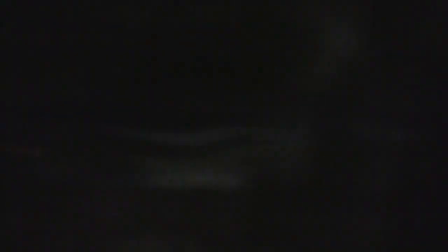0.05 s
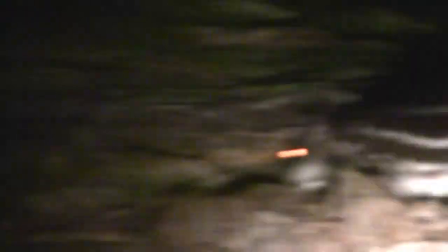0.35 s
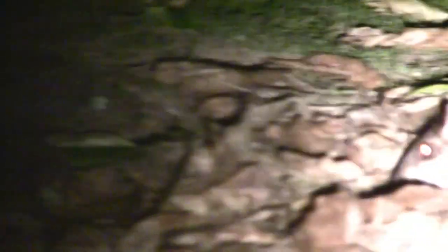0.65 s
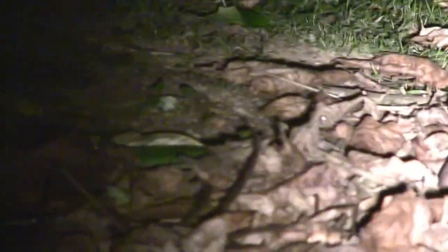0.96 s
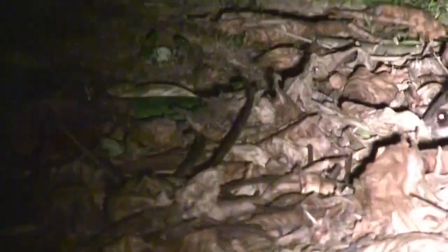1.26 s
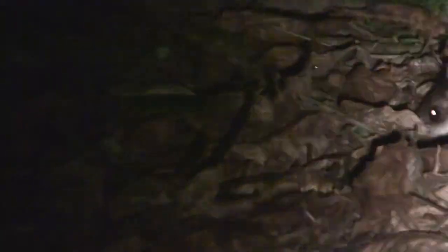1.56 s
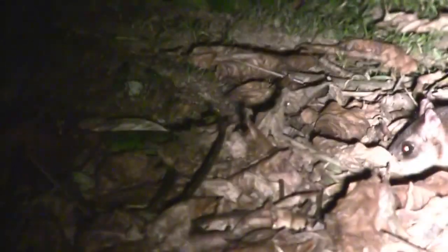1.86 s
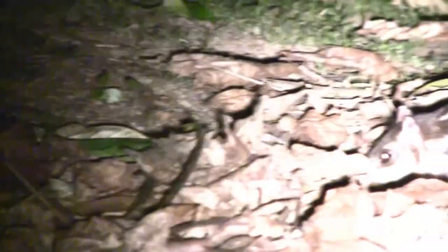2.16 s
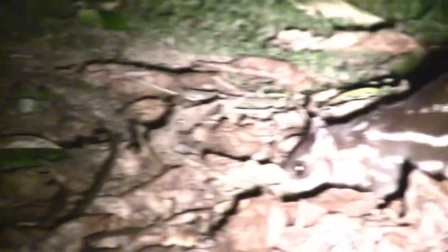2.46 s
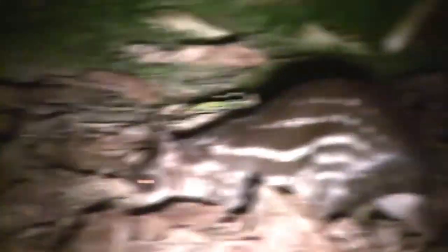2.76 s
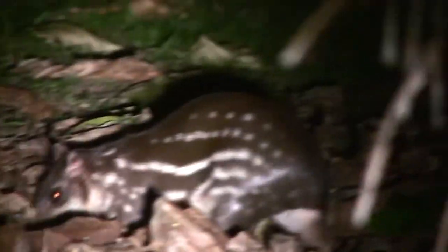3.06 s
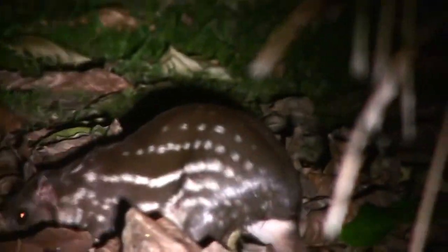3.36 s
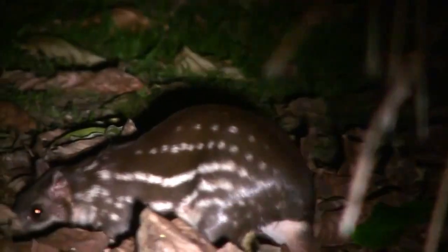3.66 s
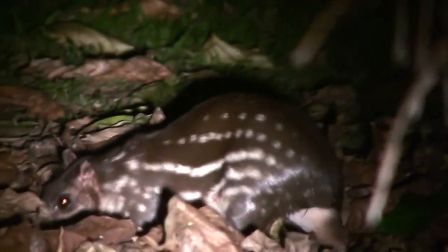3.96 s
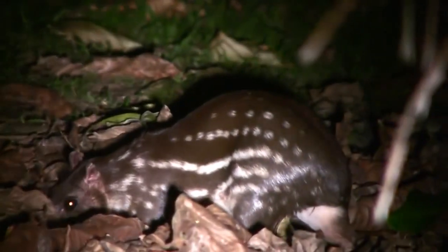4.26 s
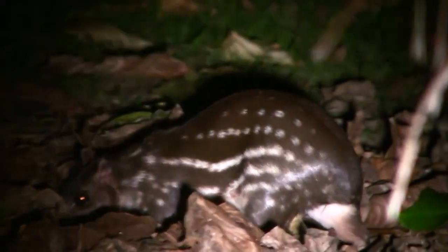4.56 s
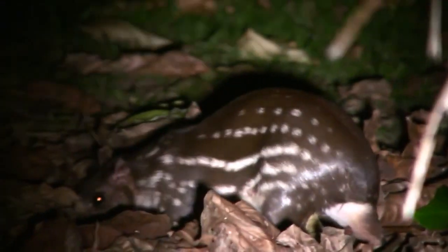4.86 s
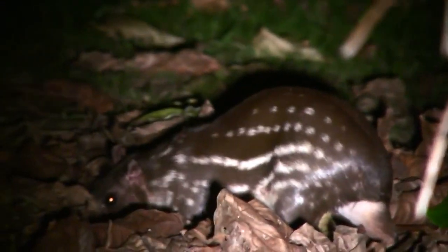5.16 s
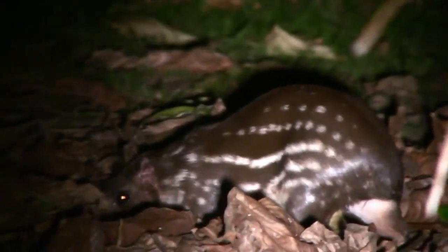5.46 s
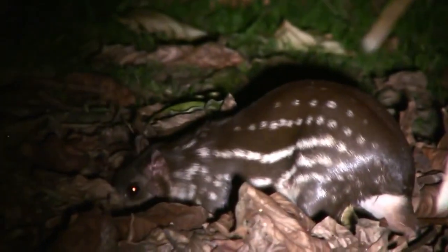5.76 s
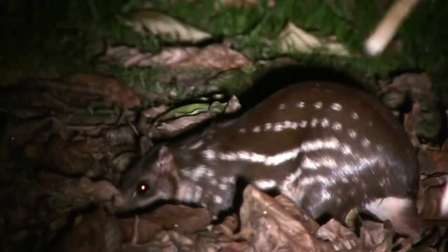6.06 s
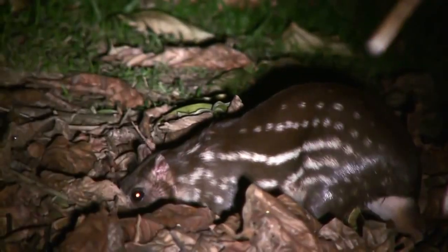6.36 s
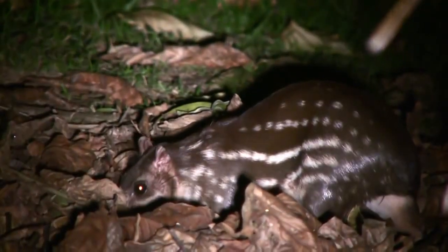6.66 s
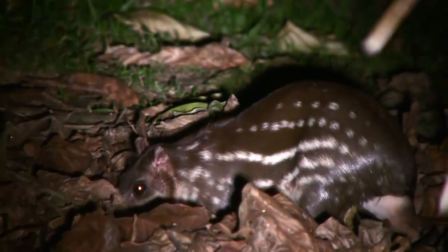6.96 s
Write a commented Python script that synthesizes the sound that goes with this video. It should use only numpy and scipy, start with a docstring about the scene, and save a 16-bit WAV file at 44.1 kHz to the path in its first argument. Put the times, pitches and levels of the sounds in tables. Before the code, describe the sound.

A shrill but soft wash of night insects runs throughout, picked up by a hand-held camera in a forest, with regular cricket chirps, swelling trills and a very faint motor hum. About four seconds in comes a close, deep handling thump, the loudest sound. Several more dull knocks follow between five and six seconds. The chorus carries on, and a katydid starts ticking quickly in the last second.

```python
"""A forest at night, heard from a hand-held camera whose motor hums faintly.
Insects sing by tooth strikes that drive a wing resonance. Far ones merge into shrill bands;
nearer ones chirp, buzz and swell. A high katydid hiss stops and a ticking song starts.
Fingers knock dully on the camera, ringing its body modes. Dry leaves stir over a soft air hiss."""
import sys
import numpy as np
from scipy import signal
from scipy.fft import rfft, irfft, next_fast_len
from scipy.io import wavfile

SR = 44100
rng = np.random.default_rng(int(sys.argv[2]) if len(sys.argv) > 2 else 0)


def log_audio(samples):
    """Write samples as a 16-bit WAV file to the path given in sys.argv[1]."""
    # one column per channel
    frames = np.atleast_2d(samples).T
    # limit to full scale, then quantise
    limited = np.clip(frames, -1, 1)
    pcm = np.round(limited * 32767).astype(np.int16)
    wavfile.write(sys.argv[1], SR, pcm)


N = 317510
TIME_S = np.arange(N) / SR
FFT_SIZE = next_fast_len(N, real=True)
BINS_HZ = np.fft.rfftfreq(FFT_SIZE, 1 / SR)

# Near cricket. Each row: start in seconds, level in dB.
CHIRPS = [(.335, -55.5), (.985, -55.8), (1.595, -55), (2.2, -54.3), (2.76, -53), (3.30, -57),
          (3.825, -55.3), (4.345, -54.5), (4.89, -54.3), (5.39, -54), (5.88, -55), (6.435, -55.3),
          (6.985, -55)]
# Its wing resonance. Each row: time in seconds, centre in Hz, width in Hz.
CHIRP_WING = [(0, 3535, 200), (2.2, 3530, 200), (3.4, 3610, 280), (7.2, 3575, 330)]
# Buzzer's wing response. Each row: frequency in Hz, line level in dB.
BUZZ_WING = [(5800, -66.5), (5935, -68), (6070, -64.5), (6205, -59.5), (6340, -62), (6475, -67),
             (6610, -75.5), (6750, -88)]
# Trills. Each row: start in seconds, relative level in dB, strike rate in Hz, wing resonance in Hz.
TRILLS = [(-.41, -58, 229, 5035), (1.32, -57, 157.3, 5190), (1.36, -56, 131.15, 5090),
          (1.4, -60, 141.75, 4800), (1.65, -55.5, 141.85, 4950), (1.66, -61, 135.8, 5140),
          (3.35, -59, 159, 5245), (3.45, -55, 227.7, 5040), (3.5, -57, 131.4, 4165),
          (3.55, -57, 157.3, 4880), (3.6, -57, 141.55, 4810), (4.27, -57.5, 142.2, 5005),
          (5.48, -57, 158.9, 5170), (5.62, -60, 227.5, 5040), (5.74, -55.5, 141, 4810),
          (5.7, -58.5, 131.2, 4860)]
# Katydid spectra. Each row: frequency in Hz, relative density in dB.
HISS_SPECTRUM = [(8500, -33.5), (10200, -17.5), (11300, -10.5), (11850, -1.5), (12400, -9), (13800, -7.5),
                 (15000, -16), (15500, -10.5)]
TICK_SPECTRUM = [(7300, -36), (7800, -10), (8250, 0), (9000, 2.5), (9400, -3), (10100, -6), (10700, -13),
                 (11700, -32)]
# Finger knocks. Each row: start in seconds, thump, shove and click in dB, contact cutoff in Hz.
KNOCKS = [(1.067, -59, -37, -59, 600), (1.392, -58, -40, -73, 400), (4.031, -16.5, -18.5, -34.5, 1750),
          (5.317, -20.5, -20, -38.5, 1450), (5.686, -25.5, -25.5, -63, 520), (5.77, -30, -26.5, -64, 400),
          (5.96, -40, -31.5, -69, 300), (6.093, -26.5, -19, -53.5, 623)]
# Camera body modes. Each row: frequency in Hz, gain in dB, T60 in seconds, rise in seconds,
# right minus left in dB, right lag in radians.
BODY_MODES = [(45, 6, 0.25, 0.035, -5, 2.7), (38, -13, 0.87, 0.024, -4, 2.7),
              (94.9, -2.5, 0.28, 0.018, -9.5, 1.7), (114.6, 2.5, 0.14, 0.026, -13.5, 0.83),
              (233, 6, 0.097, 0.0048, -8, 0.55), (275, -2, 0.074, 0.0034, 2, 3.08),
              (402, -7, 0.043, 0.00068, -12, 1.7), (757, -2.5, 0.031, 0.00099, -1.5, 1.32),
              (1064, 0.5, 0.023, 0.0007, -7, 2.9), (1295, -0.5, 0.017, 0.00045, -2.5, 2.28),
              (1540, -3, 0.013, 0.00078, 5, 2.8)]
# Grip taps. Each row: centre in seconds, level in dB.
TAPS = [(1.1, -60), (1.19, -67), (1.224, -68), (5.72, -63), (5.857, -64), (6.125, -57), (6.152, -62)]
# Far cricket's rasps. Each row: centre in seconds, level in dB.
RASPS = [(.14, -60), (.48, -59), (.93, -57.5), (1.38, -56), (1.92, -57.5), (2.38, -59), (2.84, -58.5),
         (3.38, -56), (3.83, -56), (4.27, -56), (4.74, -59), (5.33, -59.5), (5.8, -59), (6.3, -57),
         (6.81, -61), (7.2, -55)]
# Their spectrum. Each row: centre in Hz, width in Hz, relative level in dB.
RASP_BANDS = [(4290, 170, 0), (4540, 90, -4.5)]
# Pulsing crickets. Each row: start and length in seconds, level in dB, centre and width in Hz,
# pulse rate in Hz, its rise in Hz per second.
PULSERS = [(-.027, 7.4, -66.5, 3970, 130, 10.78, .045), (0, 1.2, -66, 4310, 120, 12, 0),
           (.41, .57, -61.5, 5340, 110, 10.5, 0), (2.92, .52, -65, 5320, 110, 10.5, 0),
           (0, 7.3, -66.5, 5930, 200, 13, 0), (0, 7.3, -82, 2480, 160, 3.1, 0)]
# Thin cricket notes. Each row: start and length in seconds, level in dB, pitch in Hz.
WHISTLES = [(-.05, .3, -67, 3305), (.02, .43, -69, 4635), (.55, .27, -66, 3311), (0, 2.6, -71.5, 3425),
            (2.7, 4.6, -71.5, 3452), (3.4, .6, -69, 4635), (3.5, 3.8, -74.5, 4505), (4.3, 2, -71, 4366),
            (6.3, 1, -66.5, 4360), (6.5, .8, -72, 4635)]
# Leaf scrapes. Each row: start and length in seconds, level in dB, centre and width in Hz.
LEAF_SCRAPES = [(1.21, .016, -65.5, 1410, 1800), (1.578, 0.028, -67, 1600, 1800),
                (2.773, 0.018, -68.5, 1400, 500), (4.714, 0.034, -70.5, 1440, 500)]
# Far chorus, one band a species. Each row: centre in Hz, width in Hz, level in dB.
CHORUS_BANDS = [(2950, 320, -77.5), (3160, 110, -71.5), (3333, 99.3, -66), (3480, 140, -65.5),
                (3700, 170, -63), (3925, 260, -61.5), (4260, 190, -64), (4540, 90, -71.5), (4620, 200, -70),
                (5000, 260, -62.5), (5476, 400, -59.5), (5880, 250, -59.5), (6190, 280, -64),
                (6870, 900, -68.5)]
# Still air and microphone hiss. Each row: frequency in Hz, density in dB per Hz.
AIR_SPECTRUM = [(20, -79.5), (42, -76), (70, -86.5), (110, -90), (230, -94), (400, -100), (750, -101),
                (1200, -104), (2000, -105), (2500, -102), (7900, -107), (10500, -104), (13000, -106),
                (16000, -107)]
# Diffuse sound at the two microphone ports. Each row: frequency in Hz, coherence (clipped to 0-1).
PORT_COHERENCE = [(30, -0.5), (70, 1), (250, 0.18), (600, 0.31), (3000, 0.15), (6000, 0.34), (12000, 0.62)]
# Each row: frequency in Hz, left phase lead in radians.
PORT_LEAD = [(30, 2), (2200, 0), (3500, 0.7), (3900, -0.12), (5250, -2), (5700, -3.5), (6400, -1.5),
             (8400, 1.5), (13800, -1.5), (15500, -0.5)]
# Each row: frequency in Hz, left minus right in dB.
PORT_BALANCE = [(30, 5), (120, -1), (400, 2.5), (2000, 0), (5000, 2.5), (9000, 0), (13000, -0.4)]


def chirping_cricket():
    """Slowly sagging tooth strikes chirp nearly twice a second, raspier as the wing resonance widens."""
    strike_hz = (186.25 - .48 * TIME_S) * (1 + 0.0004 * drift(58))
    time_s, centre_hz, width_hz = np.transpose(CHIRP_WING)
    song = np.zeros(N, complex)
    for start_s, db in CHIRPS:
        stroke = gate(start_s, length_s=.205, edge_s=.045)
        on = stroke > 0
        response = wing(np.interp(start_s, time_s, centre_hz), np.interp(start_s, time_s, width_hz))
        song[on] += amp(db) * stroke[on] * stridulate(strike_hz[on], response, lo_hz=3090, hi_hz=3820)
    roughness = amp(.6 * drift(60))
    return forest(place(song * roughness, left_db=-2.5, lead_rad=0.85), wet_db=-15, t60_s=0.2)


def buzzing_insect():
    """A steady buzz sinks in pitch; camera movement fades each line separately at each port."""
    start_hz, settled_hz, settle_s = 135.98, 133.95, 4.9
    strike_hz = settled_hz + (start_hz - settled_hz) * np.exp(-TIME_S / settle_s)
    mean_hz = np.mean(strike_hz)
    cycles = np.cumsum(strike_hz * (1 + 0.00015 * drift(8))) / SR
    song = np.zeros((2, N))
    for k in range(round(BUZZ_WING[0][0] / mean_hz), round(BUZZ_WING[-1][0] / mean_hz) + 1):
        fading_db = 2.0 * np.array([drift(.7), drift(.7)])
        line = place(np.exp(2j * np.pi * k * cycles), left_db=0.3, lead_rad=-2.0)
        song += amp(log_interp(BUZZ_WING, k * mean_hz) + fading_db) * line
    return forest(song, wet_db=-16, t60_s=0.29)


def trilling_insects():
    """A few insects swell together about every two seconds; a far crowd rises fast and falls slowly."""
    song = np.zeros(N, complex)
    for start_s, db, rate_hz, wing_hz in TRILLS:
        swell = gate(start_s, length_s=.58, edge_s=.12)
        on = swell > 0
        strike_hz = rate_hz * (1 + 0.0012 * drift(74)[on])
        trill = stridulate(strike_hz, wing(wing_hz, 170), lo_hz=wing_hz - 300, hi_hz=wing_hz + 400)
        song[on] += amp(db) * swell[on] * trill
    first_s, rise_s, period_s, lull_db, peak_db = 0.79, 0.77, 2.15, -67, -54.5
    crowd_db = np.interp((TIME_S - first_s) % period_s, [0, rise_s, period_s], [lull_db, peak_db, lull_db])
    crowd = band_noise(5110, width_hz=590) * amp(crowd_db)
    song *= amp(-4.0 + 0.35 * drift(14))
    return forest(place(song, left_db=-2.5, lead_rad=-1.26), wet_db=-6.0, t60_s=0.73) + crowd


def hissing_katydid():
    """A high, fluttering hiss stops, leaving the faint hiss of farther katydids."""
    near_db, far_db, stop_s, fade_db_per_s = -61, -73, 5.95, 100
    flutter = 1 + .15 * oscillator(45.8 + .3 * drift(2)).imag
    level_db = np.maximum(near_db - fade_db_per_s * np.maximum(TIME_S - stop_s, 0), far_db)
    return shaped_noise(HISS_SPECTRUM) * amp(level_db) * flutter


def ticking_katydid():
    """Ticks start hurried and settle to 16 a second; each drops in pitch onto the wing resonance."""
    first_s, gap_s, hurry_s, settle_ticks = 6.2285, .06242, .05, 3
    tick_db, scatter_db, scrape_db = -57, .8, -68
    fall_hz, fall_s, scatter_hz = 1100, .004, 90
    k = np.arange(int((TIME_S[-1] - first_s) / gap_s) + 2)
    starts_s = first_s + gap_s * k - hurry_s * (1 - np.exp(-k / settle_ticks))
    strokes, shift_hz = np.zeros((2, N))
    for start_s in starts_s:
        strokes += amp(rng.normal(tick_db, scatter_db)) * gate(start_s, length_s=.012, edge_s=.012)
        glide_hz = fall_hz * np.exp(-np.maximum(TIME_S - start_s + .004, 0) / fall_s)
        window = gate(start_s - gap_s / 4, gap_s * .75, edge_s=.002)
        shift_hz += window * (rng.normal(0, scatter_hz) + glide_hz)
    # The wings keep scraping softly between ticks.
    envelope = (strokes + amp(scrape_db)) * gate(first_s, length_s=2, edge_s=0.2)
    scrape = signal.hilbert(shaped_noise(TICK_SPECTRUM), FFT_SIZE)[:, :N]
    ticks = (scrape * oscillator(shift_hz)).real * envelope * amp(drift(700))
    return forest(ticks * amp([[1.2], [-1.2]]), wet_db=-10, t60_s=0.15)


def finger_knocks():
    """A finger thumps the shell, then lands: that rocks the camera and, if hard, clicks the high modes."""
    landing_s = .0285
    out, t = np.zeros((2, N)), TIME_S[:SR // 2]
    for touch_s, thump_db, shove_db, click_db, cutoff_hz in KNOCKS:
        for hz, mode_db, t60_s, rise_s, right_db, lag_rad in BODY_MODES:
            if hz < 70:
                start_s, blow_db = touch_s + landing_s, shove_db
            elif hz < 180:
                start_s, blow_db = touch_s, thump_db
            else:
                start_s, blow_db = touch_s + landing_s, click_db
            contact = 1 / np.sqrt(1 + (hz / cutoff_hz) ** 8)
            envelope = amp(blow_db + mode_db - 60 * t / t60_s) * (1 - np.exp(-t / rise_s))
            left = contact * envelope * np.exp(2j * np.pi * hz * t)
            right = left * amp(right_db) * np.exp(-1j * lag_rad)
            add_at(out, round(start_s * SR), np.array([left, right]).imag)
    return out


def grip_taps():
    """The grip shifts: brief, damped thuds of the shell."""
    shell_hz, width_s = 344, 0.0029
    thuds = np.zeros(N, complex)
    for centre_s, db in TAPS:
        t = TIME_S - centre_s
        thuds += amp(db) * np.exp(-(t / width_s) ** 2 + 2j * np.pi * shell_hz * t)
    return place(thuds, left_db=7.0, lead_rad=0.54)


def rasping_cricket():
    """A far cricket rasps about twice a second, blurred by the trees."""
    length_s = 0.25
    strokes = sum(amp(db) * gate(centre_s - length_s / 2, length_s, edge_s=0.32) for centre_s, db in RASPS)
    return unit_rms(diffuse(bands(RASP_BANDS))) * strokes


def pulsing_crickets():
    """Far crickets throb, each at its own pace."""
    out = np.zeros((2, N))
    for start_s, length_s, db, hz, width_hz, rate_hz, rise_hz_per_s in PULSERS:
        t = TIME_S - start_s
        throb = unit_rms(np.sin(np.pi * (rate_hz * t + rise_hz_per_s * t ** 2 / 2)) ** 4)
        out += amp(db) * gate(start_s, length_s, edge_s=0.05) * throb * band_noise(hz, width_hz)
    return out


def whistling_crickets():
    """Far crickets hold thin, nearly pure notes."""
    song = np.zeros(N, complex)
    for start_s, length_s, db, hz in WHISTLES:
        note = oscillator(hz * (1 + 0.00066 * drift(31)))
        song += amp(db) * gate(start_s, length_s, edge_s=0.068) * note
    return forest(place(song, left_db=6.5, lead_rad=0.2), wet_db=-19, t60_s=0.35)


def chorus_peeps():
    """Single sagging notes stand out of the chorus at random, each from its own direction."""
    peeps_per_s, length_s, sag_hz_per_s = 26, .28, 40
    out, t = np.zeros((2, N)), TIME_S[:int(length_s * SR)]
    envelope = np.sin(np.pi * t / length_s)
    species = CHORUS_BANDS[1:-2]
    for when, band, pitch, softness, side, phase in rng.random((int(peeps_per_s * TIME_S[-1]), 6)):
        centre_hz, width_hz, band_db = species[int(band * len(species))]
        start_hz = centre_hz + width_hz * (pitch - .5)
        note = envelope * np.exp(2j * np.pi * (start_hz - sag_hz_per_s * t / 2) * t)
        note *= amp(band_db - 3 - 5 * softness)
        add_at(out, int(when * N), place(note, left_db=6 * (2 * side - 1), lead_rad=2 * np.pi * phase))
    return forest(out, wet_db=-21, t60_s=0.26)


def far_chorus():
    """Countless far insects merge into bands, wavering in three groups."""
    return sum(diffuse(bands(CHORUS_BANDS[k::3])) * amp(0.8 * drift(11)) for k in range(3))


def dry_leaves():
    """Faint scrapes in the leaf litter."""
    return sum(amp(db) * gate(start_s, length_s, edge_s=0.0063) * band_noise(hz, width_hz)
               for start_s, length_s, db, hz, width_hz in LEAF_SCRAPES)


def motor_hum():
    """The camera's motor, close to the left port."""
    tone = oscillator(149.8 * (1 + 0.0011 * drift(1.95)))
    return amp(-69 + 0.5 * drift(4.5)) * place(tone, left_db=15.0, lead_rad=1.0)


def air():
    """Still air and microphone hiss; handling rustle briefly lifts the part below 2 kHz."""
    low_share = 1 / (1 + (BINS_HZ / 2000) ** 4)
    density = amp(log_interp(AIR_SPECTRUM, BINS_HZ))
    handling_db = 3.5 * gate(start_s=0.93, length_s=0.79, edge_s=0.57)
    lows = diffuse(density * np.sqrt(low_share)) * amp(handling_db + drift(9.5))
    return lows + diffuse(density * np.sqrt(1 - low_share))


def stridulate(strike_hz, response, lo_hz, hi_hz):
    """Tooth strikes through a wing: harmonics of the strike rate, as a complex wave of power 1."""
    cycles, mean_hz = np.cumsum(strike_hz) / SR, np.mean(strike_hz)
    harmonics = np.arange(int(lo_hz / mean_hz), int(hi_hz / mean_hz) + 1)
    gains = response(harmonics * mean_hz)
    wave = sum(gain * np.exp(2j * np.pi * k * cycles) for k, gain in zip(harmonics, gains))
    return wave / np.linalg.norm(gains)


def wing(centre_hz, width_hz):
    """Response of two wings that share one resonance."""
    return lambda hz: 1 / (1 + 2j * (hz - centre_hz) / width_hz) ** 2


def forest(x, wet_db, t60_s):
    """Trunks and leaves scatter a short, wavering tail."""
    t = TIME_S[:SR // 2]
    tail = rng.standard_normal((2, len(t))) * amp(-60 * t / t60_s) * (t > .004)
    scattered = signal.fftconvolve(x * drift(66), tail / np.linalg.norm(tail[0]), axes=1)[:, :N]
    return x + amp(wet_db) * scattered


def place(wave, left_db, lead_rad):
    """Direction as a level and phase difference between the ports."""
    tilt = amp(left_db / 2)
    return np.sqrt(2) * np.array([wave * tilt, wave * np.exp(-1j * lead_rad) / tilt]).real


def diffuse(gain):
    """Noise from all around at the two ports; gain is per root Hz."""
    shape = (2, len(BINS_HZ))
    left, independent = rng.standard_normal(shape) + 1j * rng.standard_normal(shape)
    coherence = np.clip(log_interp(PORT_COHERENCE, BINS_HZ), 0, 1)
    tilt = amp(log_interp(PORT_BALANCE, BINS_HZ) / 2)
    hz, lead_rad = np.transpose(PORT_LEAD)
    right = coherence * left + np.sqrt(1 - coherence ** 2) * independent
    right *= np.exp(-1j * log_interp(np.c_[hz, np.unwrap(lead_rad)], BINS_HZ))
    spectra = np.array([left * tilt, right / tilt]) * gain
    return irfft(spectra, FFT_SIZE)[:, :N] * np.sqrt(FFT_SIZE * SR) / 2


def bands(rows):
    """Gain per root Hz of bell-shaped bands."""
    return np.sqrt(sum(amp(db) ** 2 / width_hz * np.exp(-np.pi * ((BINS_HZ - hz) / width_hz) ** 2)
                       for hz, width_hz, db in rows))


def band_noise(hz, width_hz):
    """One diffuse band, rms 1."""
    return unit_rms(diffuse(bands([(hz, width_hz, 0)])))


def shaped_noise(spectrum):
    """Diffuse noise of a given spectrum, rms 1."""
    return unit_rms(diffuse(amp(log_interp(spectrum, BINS_HZ))))


def oscillator(hz):
    """Complex tone of varying frequency."""
    return np.exp(2j * np.pi * np.cumsum(hz) / SR)


def gate(start_s, length_s, edge_s):
    """Window with soft ends."""
    inside_s = np.minimum(TIME_S - start_s, start_s + length_s - TIME_S)
    return np.sin(np.pi / 2 * np.clip(inside_s / edge_s + .5, 0, 1)) ** 2


def drift(hz):
    """Random wander of rms 1, up to about the given rate."""
    spectrum = rfft(rng.standard_normal(FFT_SIZE)) / (1 + (BINS_HZ / hz) ** 4)
    return unit_rms(irfft(spectrum, FFT_SIZE)[:N])


def log_interp(points, hz):
    """Interpolates on a log-frequency axis."""
    points_hz, values = np.transpose(points)
    return np.interp(np.log(hz + 1), np.log(points_hz + 1), values)


def add_at(out, start_sample, sound):
    part = out[:, start_sample:start_sample + sound.shape[1]]
    part += sound[:, :part.shape[1]]


def amp(db):
    return 10 ** (np.asarray(db) / 20)


def unit_rms(x):
    return x / np.sqrt(np.mean(x ** 2) + 1e-20)


def scene():
    """Insects, air and leaves, plus the camera's own noises."""
    background = air() + far_chorus()
    insects = chirping_cricket() + buzzing_insect() + trilling_insects()
    insects += rasping_cricket() + pulsing_crickets() + whistling_crickets() + chorus_peeps()
    insects += hissing_katydid() + ticking_katydid()
    return background + insects + dry_leaves() + finger_knocks() + grip_taps() + motor_hum()


def record(dry):
    """The recorder's band limit."""
    cutoff_hz = 15850
    lowpass = signal.firwin(801, cutoff_hz, window=("kaiser", 9), fs=SR)
    return signal.oaconvolve(dry, lowpass[None], "same")


dry = scene()
out = record(dry)
log_audio(out)
```